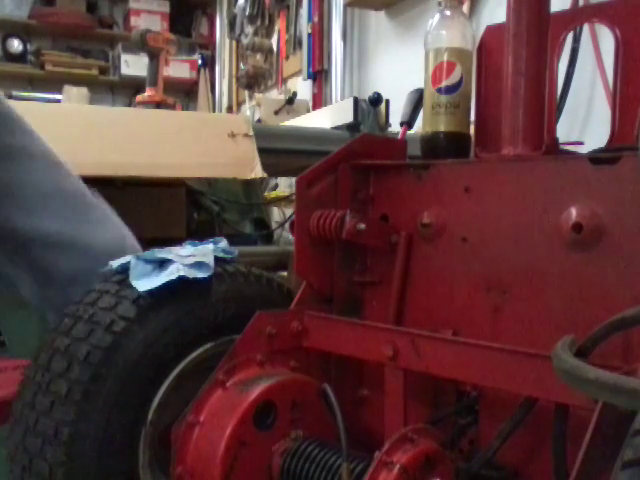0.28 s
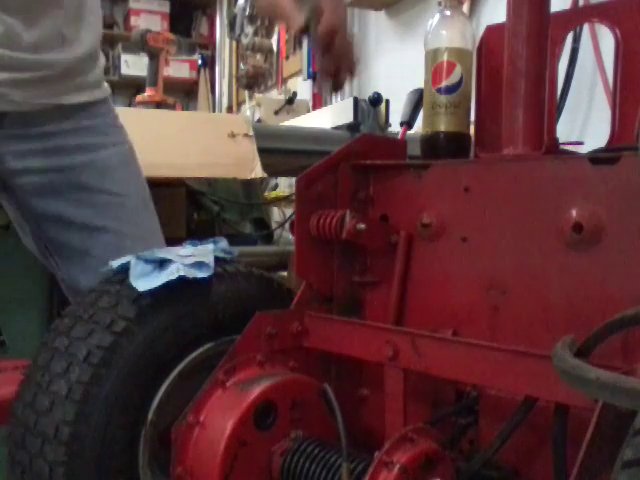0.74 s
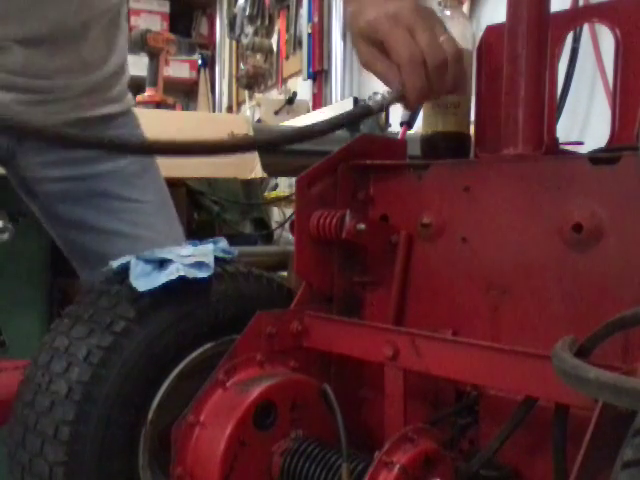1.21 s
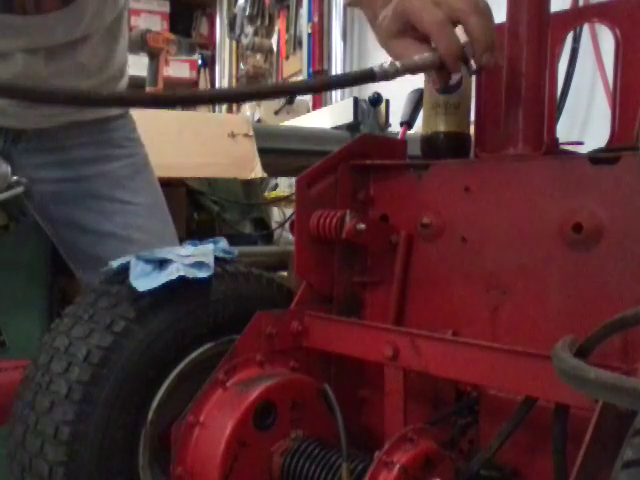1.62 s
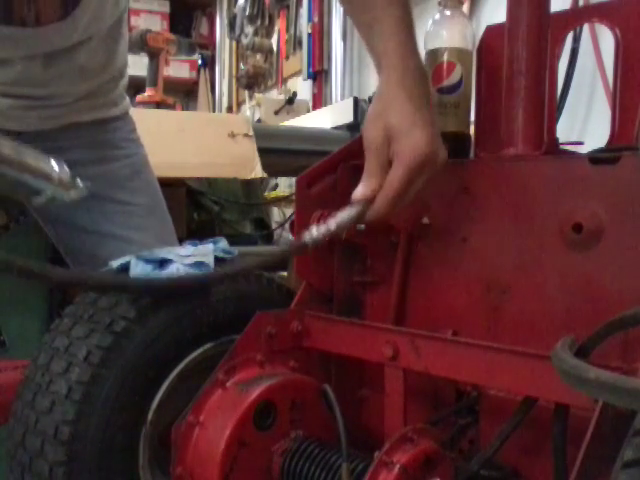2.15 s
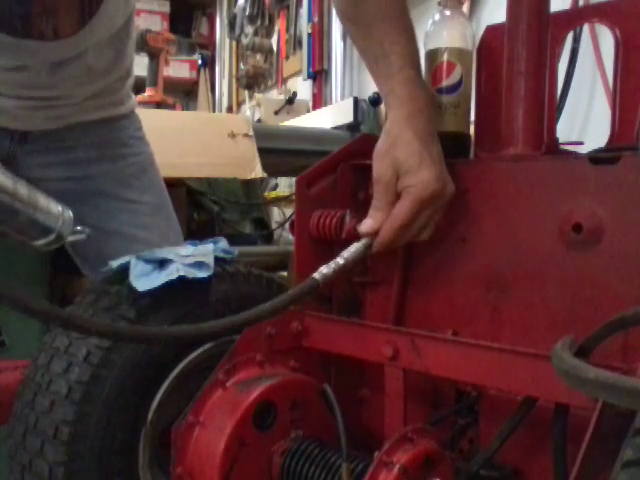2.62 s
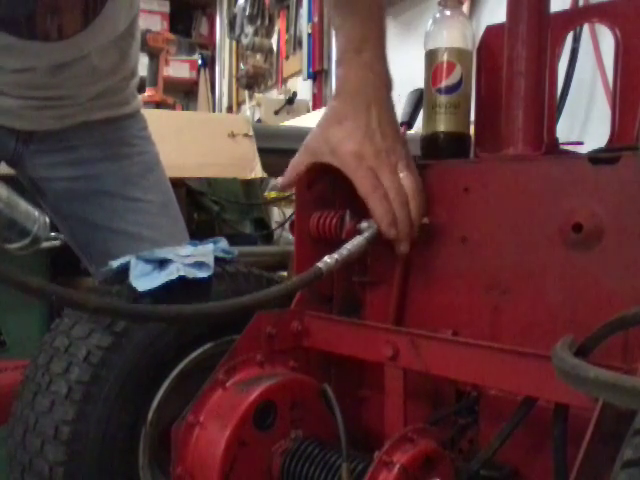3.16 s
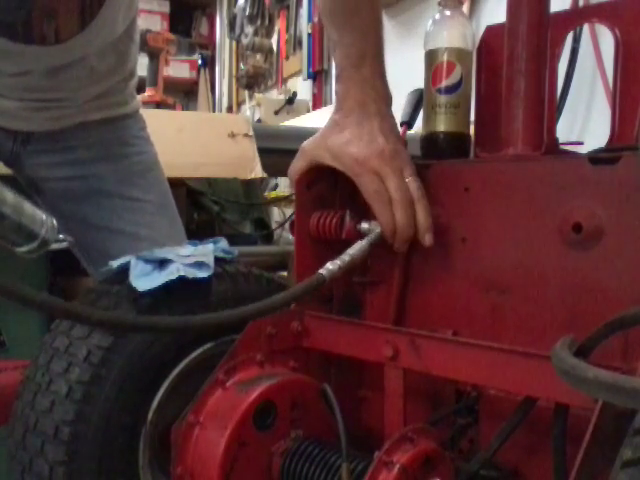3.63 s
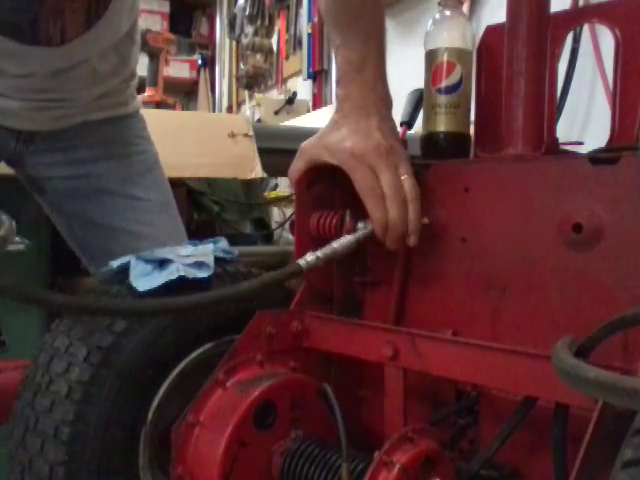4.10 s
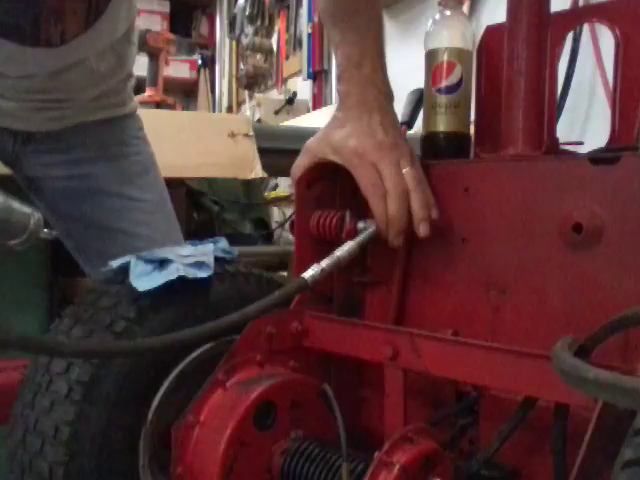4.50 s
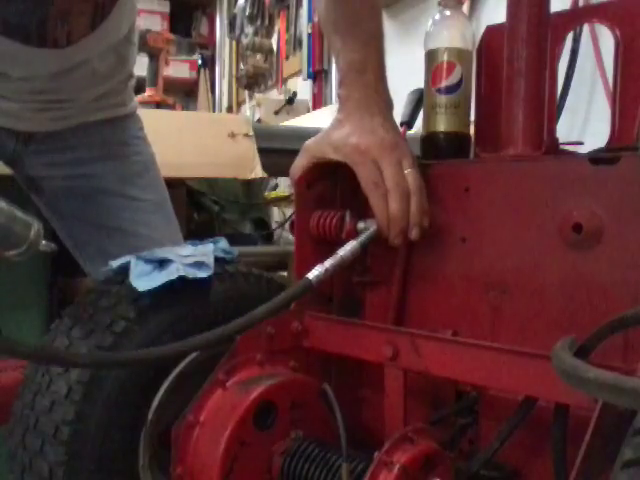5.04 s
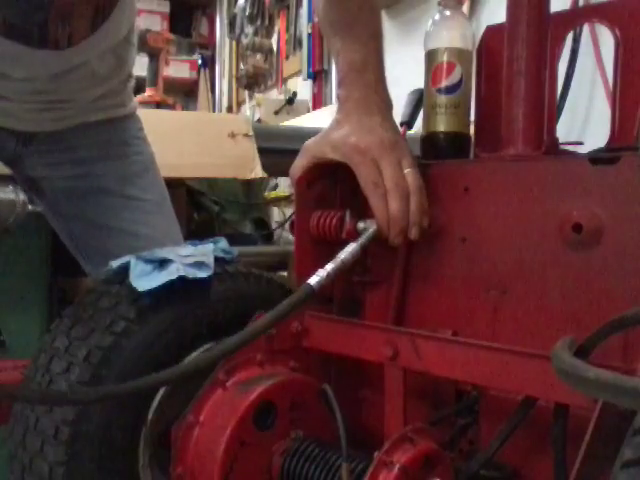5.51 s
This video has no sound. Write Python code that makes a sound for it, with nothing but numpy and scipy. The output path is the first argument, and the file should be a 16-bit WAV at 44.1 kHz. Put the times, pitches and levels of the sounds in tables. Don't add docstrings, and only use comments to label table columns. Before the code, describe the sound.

A person handles a grease gun near a camera microphone: small bright ticks, sole scrapes and dull bumps, then a clack. A pause, two ringing steel knocks with thumps, and one sharp, louder snap with a short room tail. Soft hose rubs, a light click and a brief quiet plunger rush end it, over hiss, a distant motor hum and a very high, faint, pulsing whine.

```python
import sys
import numpy as np
from scipy import signal
from scipy.fft import rfft, irfft, next_fast_len
from scipy.io import wavfile
from scipy.ndimage import uniform_filter1d

SR = 44100
rng = np.random.default_rng(int(sys.argv[2]) if len(sys.argv) > 2 else 0)


def how_loud(loudness_db):
    steps = np.asarray(loudness_db, float) / 20
    return 10 ** steps


def inscribe(sig):
    pcm = np.round(np.clip(np.atleast_2d(sig).T, -1, 1) * 32767)
    wavfile.write(sys.argv[1], SR, pcm.astype(np.int16))


N = 254232
TIME = np.arange(N) / SR
TOP_HZ = 15550


def on_log(hz, table):
    f, v = np.transpose(table)
    return np.interp(np.log(hz + 1), np.log(f), v)


def noise(n=N):
    return rng.standard_normal(n)


def colour(x, gain_db):
    n = next_fast_len(len(x))
    hz = np.fft.rfftfreq(n, 1 / SR)
    y = irfft(rfft(x, n) * how_loud(gain_db(hz)), n)[:len(x)]
    return y / np.sqrt(np.mean(y ** 2))


def hump(centre_hz, octaves):
    return lambda hz: np.maximum(-6 * (np.log2((hz + 1) / centre_hz) / max(octaves, .02)) ** 2, -70)


def fade(t, t60):
    return np.exp(-np.log(1000) * t / max(t60, .002))


def ramp(start, end, attack, release):
    climb = np.maximum(start - TIME, 0) / max(attack, .001)
    fall = np.maximum(TIME - end, 0) / max(release, .001)
    return how_loud(-20 * (climb + fall))


def flicker(rate, depth_db):
    k = int(SR / rate)
    steps = np.repeat(noise(N // k + 1), k)
    return how_loud(depth_db * uniform_filter1d(steps, k)[:N])


def add(out, s, peak_db, sound):
    i = int(s * SR)
    n = min(len(sound), N - i)
    out[i:i + n] += how_loud(peak_db) * sound[:n] / np.abs(sound).max()


def pulse(gain_db, at):
    n = np.arange(SR // 2)
    return colour(1. * (n == at), gain_db) * (n < SR // 10)


def blow(gain_db, t60, modes=(), ring_db=-99, stretch=0.71, rise=0.00046):
    t = np.arange(SR // 2) / SR
    crack = colour(noise(len(t)), gain_db) * fade(t, t60) * np.minimum(t / max(rise, 1e-4), 1)
    ring = np.zeros(len(t))
    for hz, db, ring_s in modes:
        cluster = np.zeros(len(t))
        for detune, phase in rng.standard_normal((5, 2)):
            cluster += np.sin(2 * np.pi * (hz * (1 + .016 * detune) * t + 0.14 * phase))
        ring += how_loud(db - 2) * cluster * fade(t, min(ring_s, .5) * stretch)
    return crack + how_loud(ring_db) * ring * np.minimum(t / 0.0016, 1)


def drags():
    # peak t/s, level/dB, attack/s, release/s, bass/dB
    scuffs = [
        (.03, -52.5, 0.19, 0.29, -3),
        (0.4192, -38.5, .0015, 0.013, -14),
        (.48, -45.5, 0.0038, 0.58, 8.5),
        (.755, -42, 0.064, 0.077, -12),
        (.788, -42, 0.094, 0.048, 2.5),
        (1.02, -55.5, 0.51, .08, 4),
        (1.04, -49, 0.032, 0.059, 8),
        (1.072, -53, 0.023, 0.047, 3),
        (1.128, -45, 0.0057, 0.14, -10),
        (1.444, -61, 0.36, .045, 4),
    ]
    grit, thud = np.zeros((2, N))
    for s, db, attack, release, bass_db in scuffs:
        grit += (how_loud(db) * ramp(s, s, attack, release)) ** 2
        thud += (how_loud(db + bass_db) * ramp(s, s, attack, release * 0.45)) ** 2
    return np.sqrt(grit), np.sqrt(thud)


def rumble():
    # t/s, level/dB
    footing = [(0, -65.5), (.3, -69), (.6, -61), (1.2, -61), (1.6, -69.5), (2.2, -62.5), (2.6, -62),
               (2.85, -60.5), (3.2, -63.5), (3.8, -62), (4.1, -59), (4.5, -72), (5.1, -71), (5.76, -77)]
    # f/Hz, level/dB per Hz
    rumble_colour = [(15, -35), (25, -24.5), (40, -10), (50, -18), (65, -1), (80, -4.5), (105, -1.5),
                     (140, -19.5), (200, -20.5)]
    level_db = np.interp(TIME, *np.transpose(footing)) - 3
    low_db = lambda hz: 10 * np.log10(1 / (1 + (hz / 160) ** 4))
    return how_loud(level_db) * flicker(8, 1.5) * colour(noise(), lambda hz: on_log(hz, rumble_colour) + low_db(hz))


def hiss_and_resonance():
    # f/Hz, level/dB per Hz
    air = [(76, -39), (130, -2.5), (183, -0.5), (202, -8), (326, -5.5), (353, -12.5), (415, -2.5),
           (440, -14), (468, -0.5), (497, -14), (1150, -18), (15500, -26.5)]
    bustle = uniform_filter1d(drags()[0], int(0.16 * SR))
    high_db = lambda hz: 10 * np.log10(1 - 1 / (1 + (hz / 160) ** 4) + 1e-9)
    hiss = colour(noise(), lambda hz: on_log(hz, air) + high_db(hz) - 40 * (hz > TOP_HZ))
    resonance = flicker(29.67, 3.3) * colour(noise(), hump(6300, 0.15))
    hiss_gain = np.hypot(how_loud(-71), how_loud(-16.5) * bustle)
    resonance_gain = np.hypot(how_loud(-86), how_loud(-16) * bustle)
    return hiss_gain * hiss + resonance_gain * resonance


def room_tones():
    # f/Hz, width/Hz, level/dB
    tones = [
        (68, 2, -75.5),
        (100, 5.1, -81.5),
        (110, 32, -77),
        (268, 8, -89),
        (326.4, 4.6, -82),
    ]
    out = np.zeros(N)
    for f, width, db in tones:
        out += how_loud(db) * colour(noise(), lambda hz: -20 * np.log10(1 + ((hz - f) / width) ** 2))
    return out


def motor():
    turn_hz = 58.56
    lines = {3: -80.5, 7: -81, 8: -82.5, 10: -92, 11: -89.5, 12: -91}
    out = np.zeros(N)
    for k, db in lines.items():
        tone = np.sin(2 * np.pi * (k * turn_hz * TIME + rng.random()))
        out += how_loud(db + 3) * flicker(6.8, 2) * tone
    return out


def whine():
    whine_hz, gate_hz, level_db = 14998.6, 14.908, -77
    phase = TIME * gate_hz % 1
    on = uniform_filter1d(1. * (phase > 0.24) * (phase < 0.78), size=60)
    return how_loud(level_db) * on * np.sqrt(2) * np.sin(2 * np.pi * whine_hz * TIME)


def linkage_ticks():
    # t/s, peak/dB, centre f/Hz, pin ring f/Hz, pin ring level/dB
    clicks = [(.0235, -31, 5960, 6130, -23), (0.0568, -38, 6800, 10600, -10), (0.42, -39.5, 8050, 6780, 3),
              (0.42, -35.5, 11700, 11300, -3), (0.634, -35, 8200, 10500, -4), (.675, -44, 9000, 10550, -6),
              (1.0077, -32, 9500, 8250, -10), (1.031, -42, 4000, 6100, -1),
              (1.037, -29.5, 9000, 10970, -13), (2.7717, -30, 9000, 9400, -10),
              (1.258, -43, 6460, 7900, -12), (1.412, -43, 6970, 11100, -15)]
    out = np.zeros(N)
    for s, db, hz, pin_hz, pin_db in clicks:
        shape = hump(hz, 0.57)
        sound = blow(shape, 0.0065, [(pin_hz, pin_db, 0.045)], ring_db=1.5)
        sound += 0.057 * pulse(shape, at=12)
        add(out, s, db, sound)
    return out


def shoe_drags():
    # f/Hz, level/dB per Hz
    scuff_colour = [(530, -34), (900, -22), (1270, -5), (1370, -2.5), (1880, -0.5), (2030, 2), (2470, -1.5),
                    (2690, 0.5), (6000, 0), (12000, -24.5), (15600, -64), (22000, -120)]
    grit_gain, thud_gain = drags()
    grit = colour(noise() * flicker(900, 1.9), lambda hz: on_log(hz, scuff_colour))
    thud = colour(noise(), hump(330, 1.9))
    return how_loud(-10) * flicker(39.1, 0.83) * (grit_gain * grit + how_loud(-9) * thud_gain * thud)


def bumps():
    # t/s, peak/dB, centre f/Hz, width/octaves, chatter t60/s
    knocks = [(.033, -55, 280, 0.9, 0.068), (0.477, -32.5, 407, 1.64, 0.19),
              (.578, -40.5, 210, 0.71, 0.029), (.580, -40, 780, 1.1, 0.16), (0.805, -44, 277, 0.58, 0.11),
              (1.1295, -29.5, 384, 0.82, 0.059), (1.132, -43, 810, 0.25, 0.098),
              (1.185, -51, 400, 0.63, 0.076), (2.794, -29.5, 790, 1.6, 0.12),
              (2.808, -27, 565, 1.37, 0.088), (3.870, -43, 350, 2, 0.092), (3.882, -36, 286, 1.36, 0.18)]
    out = np.zeros(N)
    for s, db, hz, octaves, t60 in knocks:
        boom = 0.013 * pulse(hump(hz, octaves), at=int(SR / hz))
        add(out, s, db, blow(hump(hz, octaves), t60, rise=0.00158) + boom)
    return out


def coupler_taps():
    # t/s, peak/dB, centre f/Hz, width/octaves, chatter t60/s
    touches = [(0.035, -50.5, 1840, 0.076, 0.036), (.110, -49, 1759, 0.77, 0.13),
               (.122, -50.5, 1760, 0.4, 0.047), (.479, -42, 3930, 0.95, 0.13),
               (.901, -50.5, 7407, 1, 0.052), (1.039, -43.5, 7860, 0.88, .15),
               (1.039, -52, 10800, .06, .12), (1.048, -48, 7830, .03, 0.069),
               (1.079, -31.5, 6140, 0.53, 0.066), (1.259, -63, 8080, .02, 0.15),
               (1.412, -63, 11050, 0.041, .2), (1.420, -56.5, 2290, 0.28, 0.06),
               (1.422, -63, 8080, 0.026, .12), (2.762, -46, 6100, .08, .06),
               (3.238, -50, 2100, 0.19, 0.031), (3.24, -48.5, 980, 0.51, 0.083),
               (3.871, -53, 3800, 0.93, 0.24), (3.881, -42, 2600, 0.3, 0.12), (4.108, -56, 2150, .1, .04),
               (4.686, -47, 6019, 0.41, 0.023), (5.592, -62, 2100, 0.21, 0.065),
               (5.630, -62, 2200, 0.18, 0.053), (5.695, -60, 3000, .5, .02)]
    out = np.zeros(N)
    for s, db, hz, octaves, t60 in touches:
        shape = hump(hz, octaves)
        add(out, s, db, blow(lambda f: shape(f) - 30 * (f > TOP_HZ), t60, rise=0.0024))
    return out


def shoves():
    # t/s, peak/dB, centre f/Hz, width/octaves, chatter t60/s
    pushes = [(.113, -55, 606, 0.89, 0.1), (2.64, -35.5, 540, 1.37, 0.3), (2.761, -35.5, 1090, 1.6, 0.088),
              (2.774, -25.5, 656, 1.66, 0.18), (2.776, -39.5, 226, 0.37, 0.28),
              (3.25, -51.5, 298, 1.64, 0.14), (3.803, -56.5, 900, 0.5, 0.08), (3.85, -48, 250, 0.91, .3),
              (3.905, -37, 283, 2.2, 0.3), (4.109, -52, 403, 1.07, 0.14), (3.36, -62.5, 794, 1.34, 0.34)]
    out = np.zeros(N)
    for s, db, hz, octaves, t60 in pushes:
        add(out, s, db, blow(hump(hz, octaves), t60, rise=0.0735 * t60))
    return out


def steel():
    # t/s, peak/dB, chatter t60/s, ring/dB, ring stretch
    lever = [
        (1.069, -24, 0.058, -14, 1),
    ]
    knock = [
        (2.614, -20.5, 0.09, -13, 1),
    ]
    rebound = [
        (2.772, -23.5, 0.076, -13, 0.84),
    ]
    snap = [
        (3.9, -14.5, 0.092, -13.5, 0.65),
    ]
    latch = [
        (4.678, -36.5, 0.038, -21, 0.55),
    ]
    # f/Hz, level/dB per Hz
    lever_crack = [(500, -17), (1750, -15), (2300, -2.5), (2900, -16), (3700, -11.5), (4500, -3.5),
                   (5300, -18), (6100, -4.5), (7500, -5), (8600, -13.5), (10500, -23), (15000, -19),
                   (16400, -43)]
    knock_crack = [(200, -23), (700, -12.5), (1120, -12.5), (1550, -12), (2120, -2.5), (2450, -8.5),
                   (2830, 0), (3300, -8), (4000, -8), (4560, -7), (5200, -9.5), (6050, -10.5), (8500, -35),
                   (15500, -64)]
    rebound_crack = [(300, -6), (600, -1), (1500, -17), (2200, -6), (3200, -10), (5300, -14.5), (6150, -8),
                     (7000, -10), (8500, -18.5), (12000, -30), (15500, -27), (16000, -62)]
    snap_crack = [(200, -23.5), (500, -24), (1070, -12), (1400, -15.5), (2200, -12), (2600, -9.5),
                  (3500, -8), (4450, -4.5), (5250, -9.5), (6080, -0.5), (6800, -16.5), (7600, -22),
                  (8600, -35), (15500, -54)]
    latch_crack = [(1000, -24.5), (2000, -21), (3700, -18.5), (4100, 2.5), (4800, -14), (6200, -2.5),
                   (7500, -11.5), (10000, -20), (15500, -22), (16400, -38)]
    # f/Hz, level/dB, t60/s
    lever_modes = [(2335, 6.5, 0.035), (4760, -24, 0.064), (6100, -3.5, 0.29), (7570, 5, 0.066),
                   (10460, -3, 0.046)]
    knock_modes = [(1090, -4, 0.4), (1560, -11.5, 0.36), (2150, 2, 0.075), (2880, 3.5, 0.082),
                   (3460, -1.5, 0.096), (4500, -7.5, 0.55), (5500, -17, 0.28), (5800, -2.5, 0.31),
                   (6100, 3, 0.083), (7203, -23, 0.27)]
    rebound_modes = [(900, -20, 0.16), (1496, -6.5, 0.51), (2100, -0.5, 0.1), (4520, -6, 0.39),
                     (5680, -0.5, 0.34), (6100, 4.5, 0.075)]
    snap_modes = [(542, -17, 0.28), (1100, -6, 0.2), (2218, -5.5, 0.34), (3160, -13, .25),
                  (4460, -10, 0.53), (5100, -20, .4), (5720, -11.5, 0.28), (6010, 2.5, 0.2),
                  (7130, -8, 0.27)]
    latch_modes = [(3970, -14, 0.22), (6215, -4, 0.09)]
    gun_room_db, frame_room_db = -9, -6
    parts = [(lever, lever_crack, lever_modes, gun_room_db),
             (knock, knock_crack, knock_modes, frame_room_db),
             (rebound, rebound_crack, rebound_modes, frame_room_db),
             (snap, snap_crack, snap_modes, frame_room_db),
             (latch, latch_crack, latch_modes, gun_room_db)]
    near, far = np.zeros((2, N))
    for blows, crack, modes, room_db in parts:
        tone = lambda hz: on_log(hz, crack)
        for s, db, t60, ring_db, stretch in blows:
            add(near, s, db, blow(tone, t60, modes, ring_db, stretch))
            add(far, s, db + room_db + 12.5, pulse(tone, at=120))
    return near, far


def finger_rubs():
    # centre t/s, half length/s, level/dB, f/Hz, width/octaves
    rubs = [
        (3.24, 0.044, -71.5, 5800, 0.084),
        (3.39, 0.042, -74.5, 6200, 0.18),
        (4.497, 0.041, -75, 5800, 0.061),
    ]
    grit = noise() * flicker(900, 1.9)
    out = np.zeros(N)
    for s, half, db, hz, octaves in rubs:
        out += how_loud(db) * np.exp(-((TIME - s) / half) ** 4) * colour(grit, hump(hz, octaves))
    return out


def plunger_stroke():
    # f/Hz, level/dB per Hz
    stroke_colour = [(500, -10.5), (1000, -20.5), (2200, -19), (4400, -18.5), (5100, -11.5), (5450, -10),
                     (5800, 0.5), (6300, -4), (7000, -8), (7900, -14), (8300, -25), (11000, -25),
                     (15500, -34), (15700, -78)]
    push = how_loud(-60) * ramp(start=5.265, end=5.648, attack=0.064, release=0.062)
    grit = noise() * flicker(900, 1.9)
    return push * flicker(60, 0.64) * colour(grit, lambda hz: on_log(hz, stroke_colour))


def garage(far):
    # f/Hz, t60/s
    room_t60 = [(60, 0.85), (250, 0.43), (700, 0.36), (2000, 0.38), (6000, 0.32), (12000, 0.47)]
    t = np.arange(SR) / SR
    tail = np.zeros(SR)
    for hz in 45 * 2 ** np.arange(9):
        tail += np.sqrt(hz) * colour(noise(SR), hump(hz, 0.63)) * fade(t, on_log(hz, room_t60))
    tail = colour(tail, lambda hz: -40 * (hz > TOP_HZ))
    tail *= np.clip((t - .003) / 0.012, 0, 1)
    return signal.fftconvolve(far, tail / np.sqrt(np.sum(tail ** 2)))[:N]


def scene():
    background = rumble() + hiss_and_resonance() + room_tones() + motor() + whine()
    clicks = linkage_ticks() + coupler_taps()
    thumps = bumps() + shoves()
    slips = shoe_drags() + finger_rubs() + plunger_stroke()
    near, far = steel()
    near = near + clicks + thumps + slips
    far = far + how_loud(-12) * clicks + how_loud(-10) * (thumps + slips)
    return (near + garage(far) + background)[None]


def top_cut(x):
    return signal.sosfilt(signal.butter(12, 16620, fs=SR, output="sos"), x)


def record(dry):
    release = fade(np.arange(SR) / SR, 0.26)
    loudness = signal.fftconvolve(dry[0] ** 2, release / release.sum())[:N]
    hiss = colour(noise(), lambda hz: -1.5 * np.log2(hz / 2000 + 0.056) - 40 * (hz > TOP_HZ))
    lifted_hiss = how_loud(-49) * np.abs(loudness) ** 0.19 * hiss
    low_pass = signal.ellip(6, .2, 50, 16400, fs=SR, output="sos")
    return top_cut(signal.sosfilt(low_pass, dry) + lifted_hiss)


dry = scene()
out = record(dry)
inscribe(out)
```